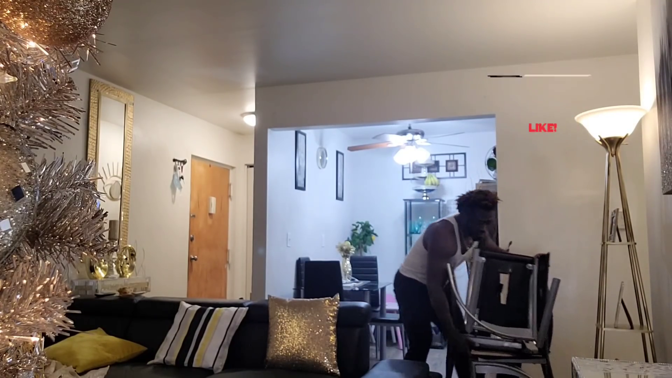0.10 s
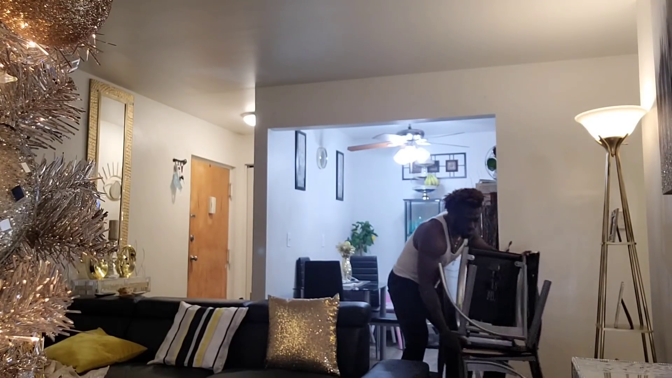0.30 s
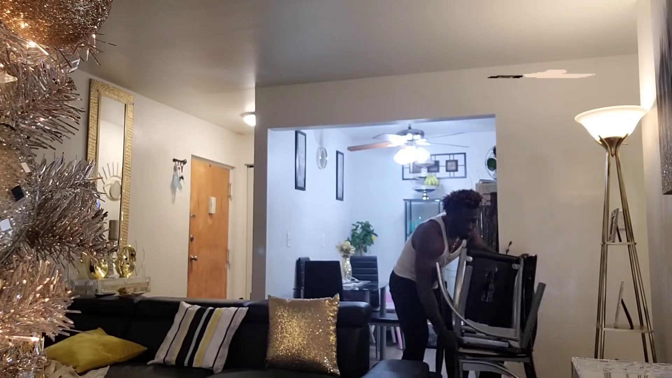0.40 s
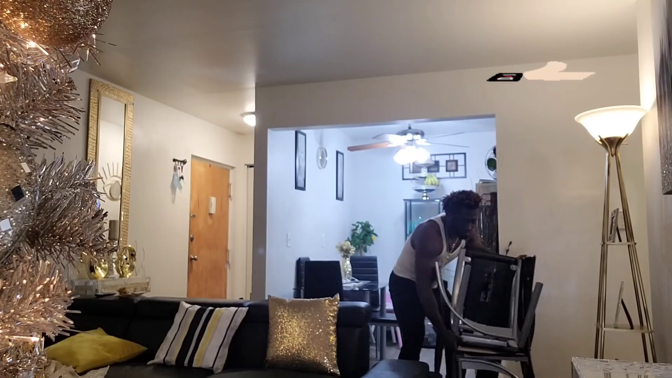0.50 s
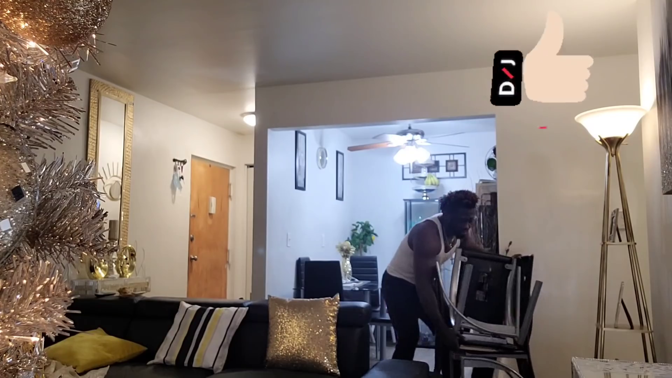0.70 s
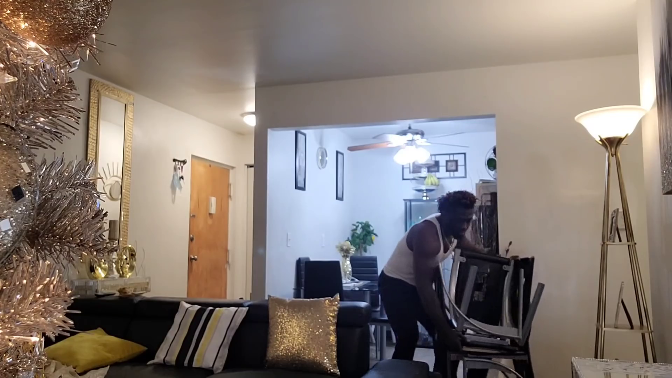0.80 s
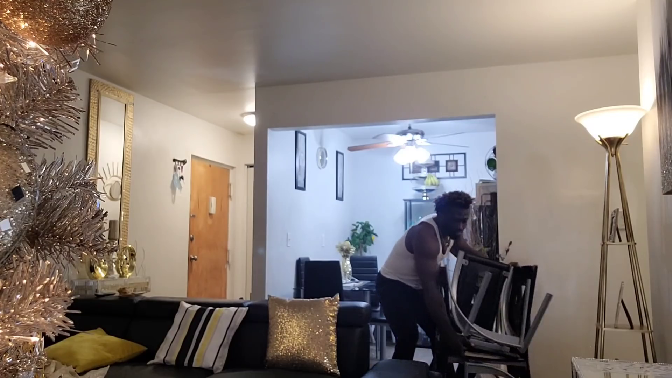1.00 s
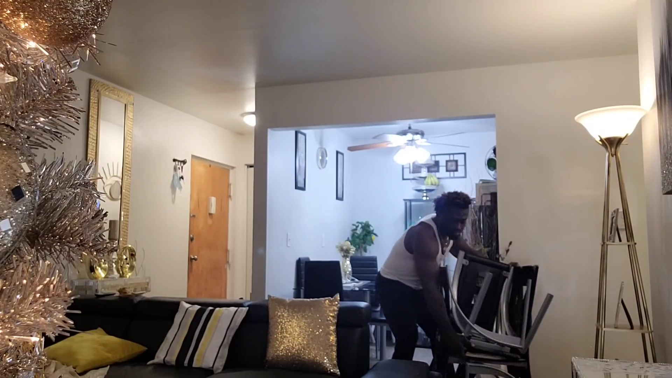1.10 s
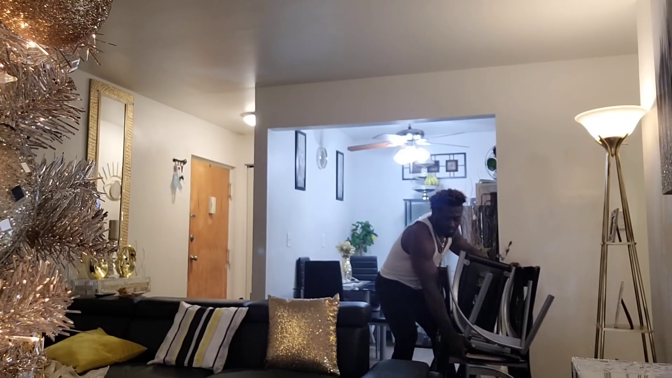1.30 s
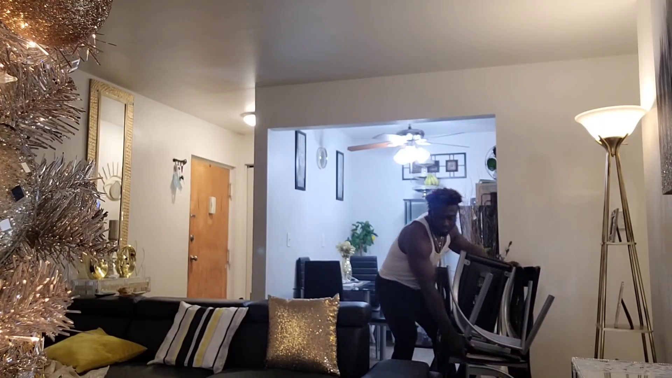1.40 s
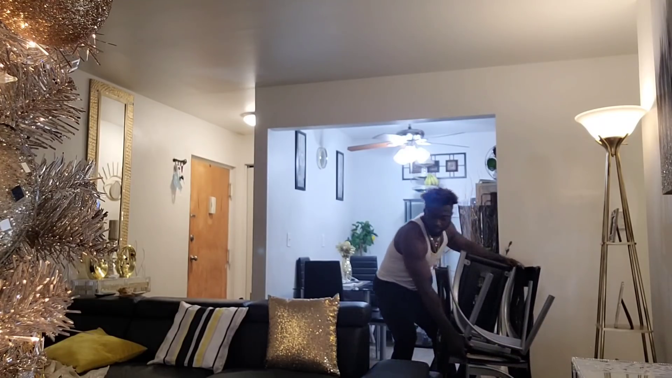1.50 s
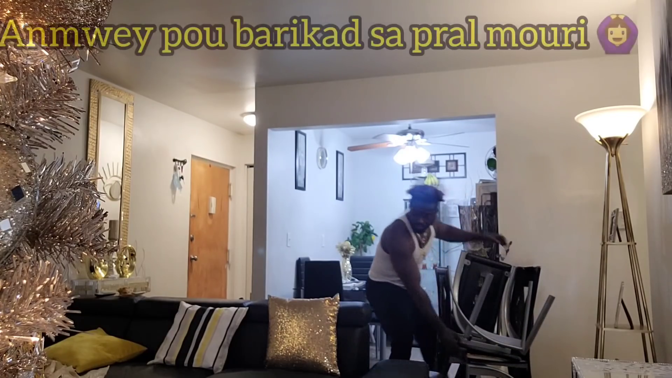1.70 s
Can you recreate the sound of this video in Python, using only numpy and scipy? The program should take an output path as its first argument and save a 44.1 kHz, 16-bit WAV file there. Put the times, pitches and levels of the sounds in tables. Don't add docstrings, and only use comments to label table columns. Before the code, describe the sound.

Metal-framed padded chairs knock and clatter together as they are stacked in a living room

```python
import sys
import numpy as np
from scipy import signal
from scipy.fft import rfft, irfft
from scipy.io import wavfile

SR = 44100
rng = np.random.default_rng(int(sys.argv[2]) if len(sys.argv) > 2 else 0)


def natural_amplitude(level_db):
    exponent = np.asarray(level_db, float) / 20
    return 10 ** exponent


def transcribe(signal):
    frames = np.atleast_2d(signal).T
    limited = np.clip(frames, -1, 1)
    pcm = np.round(limited * 32767).astype(np.int16)
    wavfile.write(sys.argv[1], SR, pcm)


N = 74970
PLACES = 4
LEAD_S = .05


def rms_one(x):
    return x / np.sqrt(np.mean(x ** 2) + 1e-20)


def at_hz(points, hz):
    table_hz, value = np.transpose(points)
    return np.interp(np.log(hz), np.log(table_hz), value)


def drift(rate_hz):
    r = np.exp(-80 * np.pi * rate_hz / SR)
    slow = signal.lfilter([1], [1, -2 * r, r * r], rng.standard_normal(N // 40 + 2002))[2000:]
    return np.interp(np.arange(N) / 40, np.arange(len(slow)), rms_one(slow))


def ring(x, hz, t60_s):
    r = 10 ** (-3 / (t60_s * SR))
    w = 2 * np.pi * hz / SR
    return signal.lfilter([0, np.sin(w)], [1, -2 * r * np.cos(w), r * r], x + 1e-18)


def band(x, low_hz, high_hz):
    sos = signal.butter(2, [low_hz, min(high_hz, .45 * SR)], "band", fs=SR, output="sos")
    return signal.sosfilt(sos, x + 1e-18)


def bands(white, gain):
    # hz, likeness (1 = same in both channels)
    likeness = [(60, 0.89), (180, .93), (300, 0.29), (600, 0.13), (1500, -0.35), (4000, -0.052),
                (12000, -0.16)]
    out = 0
    edges_hz = 22 * 2 ** np.arange(0, 10, .5)
    for k, (low_hz, high_hz) in enumerate(zip(edges_hz, edges_hz[1:])):
        mid, side = band(white[k % 2], low_hz, high_hz)
        hz = np.sqrt(low_hz * high_hz)
        alike = np.clip(at_hz(likeness, hz), -1, 1)
        stereo = np.sqrt(1 + alike) * mid + np.sqrt(1 - alike) * side * [[1], [-1]]
        out = out + gain(hz) * stereo
    return out


def hum():
    # hz, level_db_per_hz
    rumble_colour = [(15, -55), (25, -32.5), (198, -19), (260, -5), (378, -10.5), (970, -26), (1340, -25),
                     (1620, -47.5), (15500, -45)]
    # hz, rms_db, width_hz, wobble_db
    motor_tones = [(56.5, -70, 8.0, 4), (197.8, -61.5, 3.0, -1), (326, -69.5, 6.9, 3.5),
                   (1394, -80.5, 18, 2), (121, -76.5, 10.0, 5.5), (159, -73.5, 5.6, 2.5)]
    white = rng.standard_normal((2, 2, N))
    rumble = rms_one(bands(white, lambda hz: natural_amplitude(at_hz(rumble_colour, hz) + 3.0 * drift(13))))
    t = np.arange(N) / SR
    tones = 0
    for hz, rms_db, width_hz, wobble_db in motor_tones:
        level = natural_amplitude(rms_db + 5.5 + wobble_db * drift(12.0))
        cycles = hz * t + np.cumsum(width_hz * drift(10)) / SR
        tones = tones + level * np.sin(2 * np.pi * cycles)
    return natural_amplitude(-56.5) * rumble + tones


def rubbing():
    # start_s, level_db
    rub_level = [(0, -45.5), (.12, -51.5), (0.199, -50), (.45, -42.5), (.53, -46.5), (.6, -50.5),
                 (.7, -48.5), (.81, -55.5), (.93, -57.5), (1.0, -52.5), (1.06, -50.5), (1.12, -53.5),
                 (1.219, -62.5), (1.35, -64.5), (1.441, -75.5), (1.7, -81)]
    # hz, level_db_per_hz
    rub_colour = [(180, -22.5), (300, 2.5), (663, -13), (731, -4.5), (1440, -13), (1590, -14),
                  (1780, -10.5), (3130, -15), (15500, -23)]
    rub_db, grains_per_s, patchy_db = 4.5, 3400, .6
    grains = (rng.random((2, 2, N)) < grains_per_s / SR) * rng.standard_normal((2, 2, N))
    together = drift(14)
    noise = rms_one(bands(
        grains, lambda hz: natural_amplitude(at_hz(rub_colour, hz) + patchy_db * (together + drift(36)))))
    s, db = np.transpose(rub_level)
    return natural_amplitude(rub_db + np.interp(np.arange(N) / SR, s, db)) * noise


def room(places):
    # hz, t60_s
    decay = [(60, 0.15), (150, 0.27), (250, 0.23), (1000, 0.33), (4000, 0.32), (8000, 0.24), (15000, 0.051)]
    # hz, level_db
    tail_colour = [(60, -0.5), (200, -8), (320, -8.5), (500, -3.5), (800, -3.5), (1500, 0.5), (4000, 0),
                   (15000, 3.5)]
    room_db, build_s = 3.5, 0.00064
    t = np.arange(SR // 2) / SR
    heard = 0
    for x in places:
        white = rng.standard_normal((2, 2, len(t)))
        tail = bands(white, lambda hz: natural_amplitude(at_hz(tail_colour, hz)) * 10 ** (-3 * t / at_hz(decay, hz)))
        tail = tail * (1 - np.exp(-t / build_s))
        tail = natural_amplitude(room_db) * tail / np.sqrt(np.sum(tail ** 2) / 2)
        heard = heard + x + signal.fftconvolve(x[None], tail, axes=1)[:, :len(x)]
    return heard[:, int(LEAD_S * SR):][:, :N]


def chatter(length_s):
    swell_share, touches_per_s, spread_db = 0.34, 2700, 2.5
    chance, strength, sign = rng.random((3, SR // 4))
    peak = int(swell_share * length_s * SR)
    chance[peak], strength[peak], sign[peak] = 0, .2, 1
    t = np.arange(len(chance)) / SR / max(length_s, .001)
    touches = (chance < touches_per_s / SR) * natural_amplitude(-spread_db * np.log(strength + 0.0018))
    return touches * np.sign(sign - .5) * (1 - np.exp(-t / swell_share)) * np.exp(-t)


def body(x, modes):
    mode_spread_db, pitch_spread = 2.5, .04
    out = 0
    for hz, db, t60_s in modes:
        strength = natural_amplitude(db + mode_spread_db * rng.standard_normal())
        out = out + strength * ring(x, hz * (1 + pitch_spread * rng.standard_normal()), t60_s)
    return out


def add(out, s, db, hit):
    i = int((s + LEAD_S) * SR)
    out[i:i + len(hit)] += natural_amplitude(db) * hit * np.sqrt(0.029 * SR / (np.sum(hit ** 2) + 1e-12))


def loose_parts(places):
    # start_s, pitch_hz, level_db, t60_s, chatter_s
    rings = [(.235, 63, -48, 0.069, 0.0027), (.41, 73, -43.5, 0.14, 0.0021),
             (.423, 4380, -33.5, 0.0069, 0.0046), (.236, 165, -26.5, 0.13, 0.0033),
             (.476, 165, -35.5, 0.274, .003), (.475, 282, -24, 0.042, 0.0022),
             (0.682, 300, -38, 0.04, 0.0014), (.682, 752, -39, 0.021, 0.00098),
             (0.94, 170, -49.5, 0.093, .003), (1.052, 231, -40.5, 0.051, 0.0018),
             (.48, 435, -33, 0.24, .003), (1.075, 81.4, -42, 0.18, 0.0025),
             (1.105, 3420, -51, 0.062, 0.015), (0.22, 850, -54, 0.047, 0.0027),
             (.69, 1190, -44.5, 0.022, 0.00128), (0.56, 340, -53, .04, 0.0011),
             (.677, 1780, -44.5, 0.012, 0.0028), (.827, 2630, -56.5, 0.023, 0.0027),
             (1, 340, -44, 0.055, 0.0016), (1.035, 1700, -62.5, 0.037, 0.014),
             (.234, 1700, -31.5, 0.012, 0.0067), (.25, 1300, -37.5, 0.022, 0.0049),
             (.254, 2000, -37.5, .015, 0.0051), (.236, 5600, -45, .006, 0.011),
             (.234, 4600, -37.5, 0.0045, .008), (.407, 7700, -42.5, 0.0046, 0.0063),
             (.397, 900, -41.5, 0.011, 0.0014), (.423, 14800, -43.5, 0.0019, 0.0057),
             (.313, 290, -38, 0.028, 0.0014), (0.87, 240, -52, 0.044, 0.0023),
             (2.2, 370, -53, 0.028, 0.0018), (.777, 3330, -65, .008, 0.0038),
             (1.563, 3470, -86, 0.0043, 0.0018), (1.1, 5300, -73.5, 0.0044, .006),
             (.235, 520, -29, 0.055, 0.0027), (.235, 285, -25, 0.071, 0.0042), (.476, 720, -33, .04, .003),
             (.425, 4800, -37, 0.0031, 0.012), (.709, 330, -45.5, .04, 0.0028), (0.82, 180, -48, .06, .003)]
    twin_ratio, twin_share = 1.02, 0.42
    for k, (s, hz, db, t60_s, length_s) in enumerate(rings):
        touches = chatter(length_s)
        pair = ring(touches, hz, t60_s) + twin_share * ring(touches, hz * twin_ratio, t60_s)
        add(places[k % PLACES], s, db, band(pair, hz / 2, hz * 2))


def metal_ticks(places):
    # start_s, level_db, bright_hz, chatter_s
    ticks = [(-.02, -44, 7600, 0.016), (0.223, -34, 7120, 0.015), (0.408, -48, 7700, 0.0092),
             (.421, -37, 12400, 0.0081), (0.473, -43.5, 7640, 0.013), (.582, -62.5, 8200, .004),
             (0.672, -48.5, 7500, 0.02), (0.78, -62, 7100, 0.004), (0.826, -48, 4000, 0.0055),
             (0.856, -53, 13100, 0.0029), (0.981, -51, 11300, 0.024), (1.037, -54, 7650, 0.0096),
             (1.082, -46, 14500, 0.007), (1.148, -62.5, 12000, 0.0073)]
    tick_db, ring_share, ring_t60_s = -5.5, .12, .0025
    for k, (s, db, hz, length_s) in enumerate(ticks):
        touches = chatter(length_s)
        tick = touches + ring_share * ring(touches, hz, ring_t60_s)
        add(places[k % PLACES], s, db + tick_db, band(tick, 1400, 16000))


def knocks(places):
    # start_s, clank_db, thud_db, clack_db, chatter_s; the first starts just before 0
    contacts = [(-.02, -33, -30.5, -41, 0.0049), (0.154, -39.5, -51, -84, 0.0038),
                (.226, -28.5, -23, -31, 0.011), (0.23, -20, -15, -22.5, 0.0065),
                (0.394, -33, -45, -45, 0.0099), (0.415, -31.5, -45, -36, 0.0024),
                (0.421, -22.5, -29.5, -28, 0.015), (0.451, -31, -43, -58, 0.0096),
                (0.473, -28, -22.5, -29, 0.005), (0.677, -39.5, -35, -42.5, 0.0074),
                (0.767, -77, -57, -54.5, 0.0054), (0.857, -40, -38.5, -54.5, 0.006),
                (0.911, -43.5, -44, -80, 0.009), (0.929, -62, -55, -88, 0.0092),
                (0.968, -55, -50.5, -81, 0.0038), (1.026, -41.5, -49, -48, 0.019),
                (1.052, -41.5, -38.5, -48, 0.009), (1.082, -39.5, -36.5, -38, 0.007),
                (1.097, -39, -46, -50.5, 0.0053), (1.127, -47.5, -62, -78, 0.005),
                (1.25, -56.5, -54.5, -81, 0.0022)]
    # hz, level_db, t60_s
    seat = [(166.3, -5, 0.15), (214.5, -0.5, 0.2), (277.4, -3.5, 0.15), (251.4, 1, 0.064),
            (319, -7.5, 0.086), (419, -6, 0.27), (540, -14, 0.1)]
    # hz, level_db, t60_s
    frame = [(675.7, -2, 0.01437), (815, -1, 0.028), (960, 0.5, 0.027), (1155, 3.5, 0.01), (1255, 2, 0.018),
             (1670, -0.5, 0.0092), (1896, 7.5, 0.014), (1966, -7, .02), (2210, -15.5, 0.01)]
    # hz, level_db, t60_s
    thin = [(2470, -6.5, 0.013), (3240, -5, 0.0099), (3730, 0, 0.012), (4076, -1, 0.0024), (4140, -3, .02),
            (4670, -5.5, 0.018)]
    thud_trim_db, clank_trim_db, clack_trim_db = -5.0, -8, -6.0
    crack_db, snap_db = 32, 34
    for k, (s, clank_db, thud_db, clack_db, length_s) in enumerate(contacts):
        touches = chatter(length_s)
        here = places[k % PLACES]
        thud = band(body(touches, seat), 183, 460)
        clank = band(body(touches, frame) + natural_amplitude(crack_db) * touches, 547, 1700)
        clack = band(body(touches, thin) + natural_amplitude(snap_db) * touches, 2200, 5080)
        add(here, s, thud_db + thud_trim_db, thud)
        add(here, s, clank_db + clank_trim_db, clank)
        add(here, s, clack_db + clack_trim_db, band(clack, 1100, 12000))


def scene():
    places = np.zeros((PLACES, N + SR))
    knocks(places)
    metal_ticks(places)
    loose_parts(places)
    return room(places) + rubbing() + hum()


def roll_off(x):
    return signal.sosfilt(signal.butter(12, 15880, fs=SR, output="sos"), x)


def record(dry):
    # hz, level_db
    mic_response = [(120, -1), (400, -0.5), (3000, -1.5), (4800, -0.5), (5300, -3), (7800, 1), (8500, -3.5),
                    (15500, 0.5)]
    # hz, left_minus_right_db
    pan = [(60, -4), (180, -0.5), (550, -4.5), (1650, -2.0), (4970, -1), (15000, -1)]
    hz = np.maximum(np.fft.rfftfreq(N, 1 / SR), 1)
    response_db = at_hz(mic_response, hz) + at_hz(pan, hz) / 2 * np.array([[1], [-1]])
    tilted = irfft(rfft(dry) * natural_amplitude(response_db) * (hz < 15880), N)
    mix = signal.sosfilt(signal.butter(2, 40, "high", fs=SR, output="sos"), tilted)
    return roll_off(mix)


dry = scene()
out = record(dry)
transcribe(out)
```